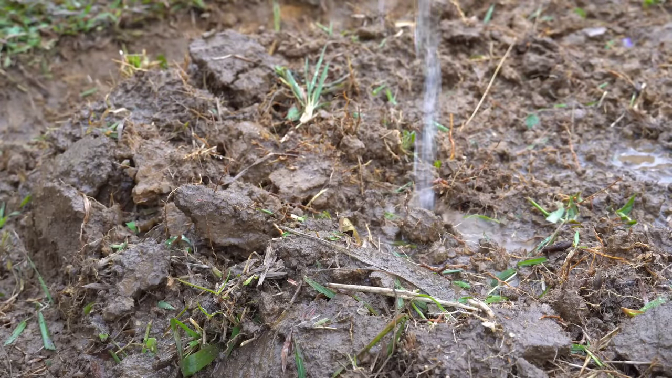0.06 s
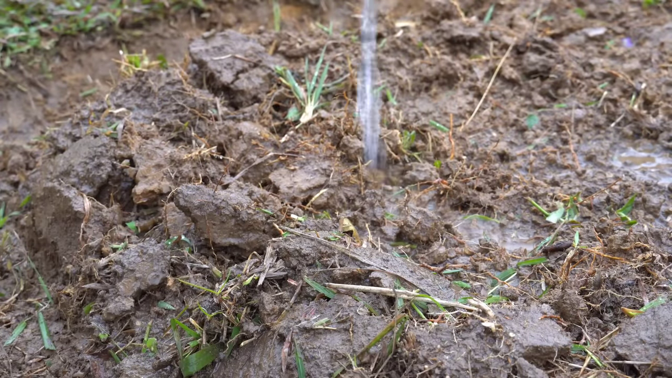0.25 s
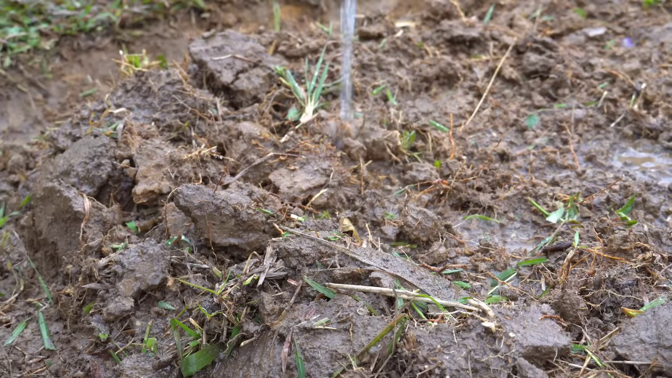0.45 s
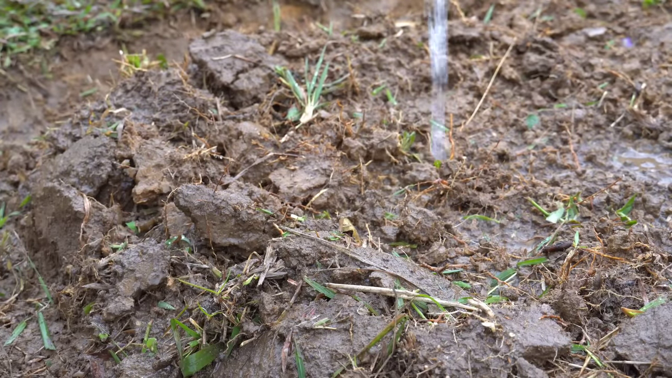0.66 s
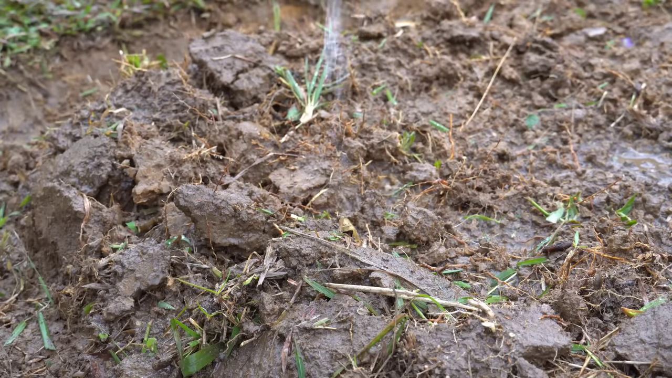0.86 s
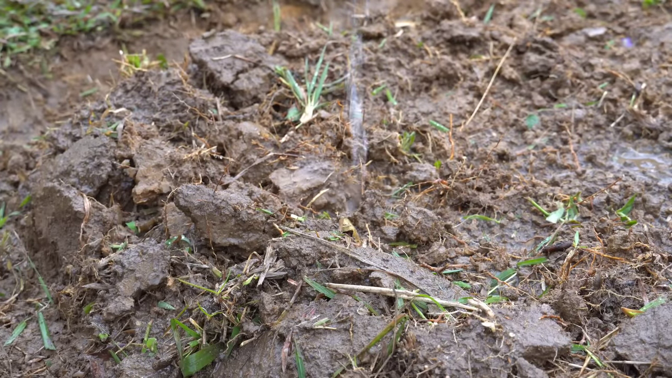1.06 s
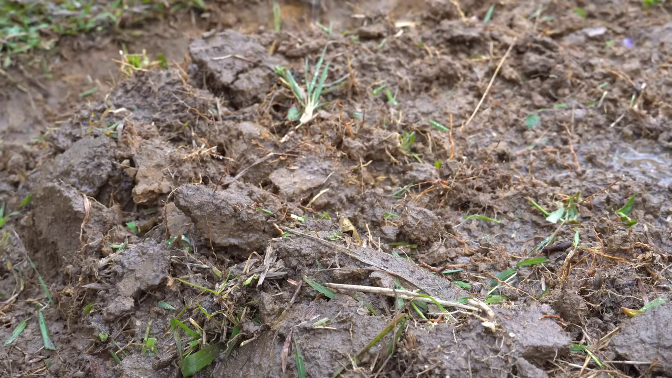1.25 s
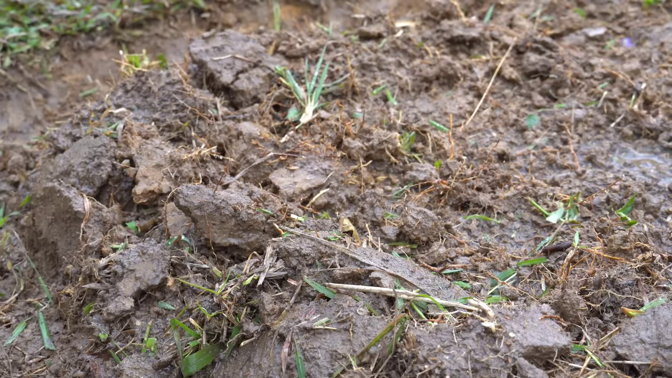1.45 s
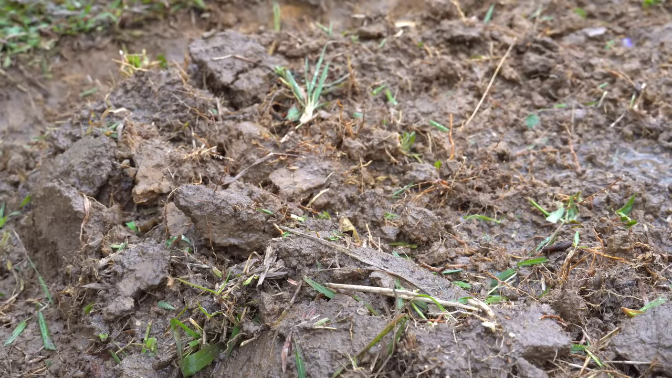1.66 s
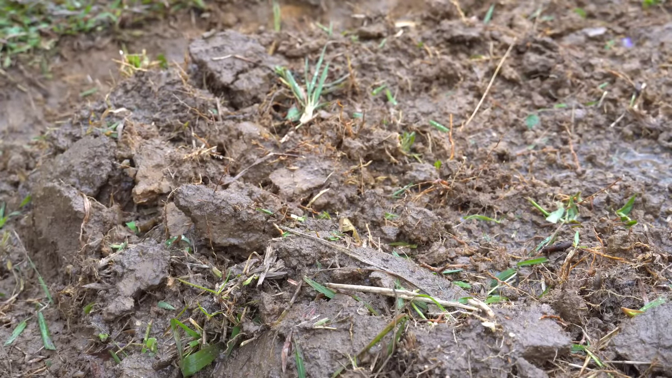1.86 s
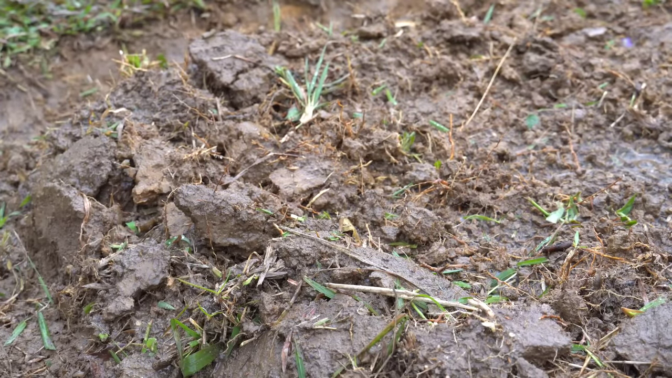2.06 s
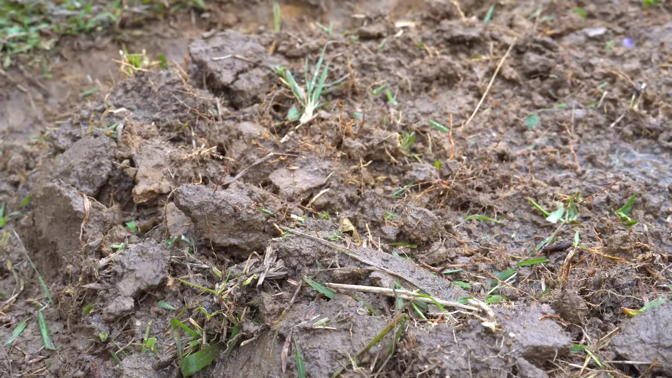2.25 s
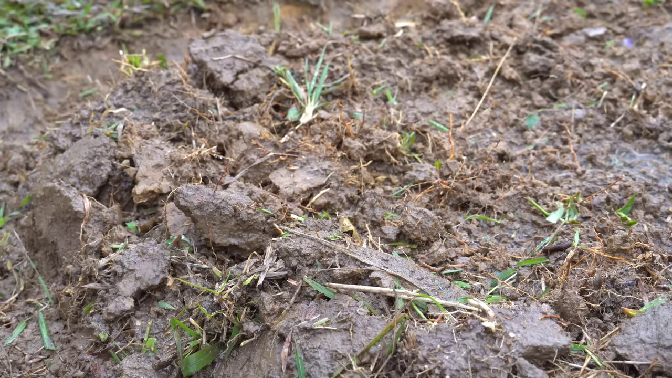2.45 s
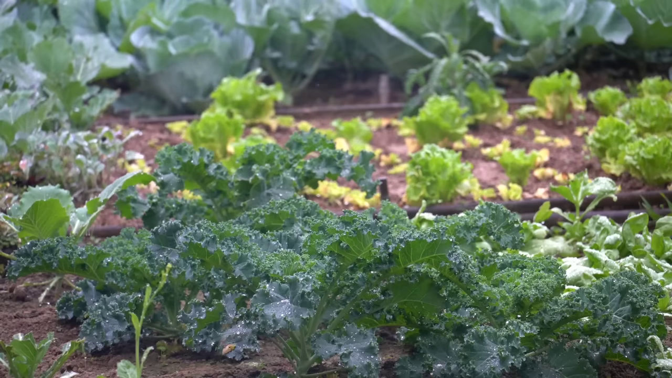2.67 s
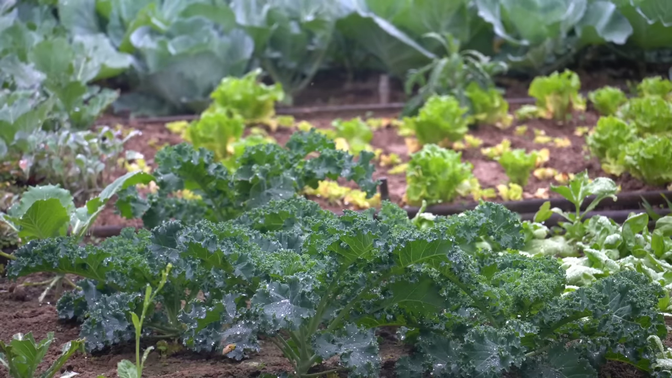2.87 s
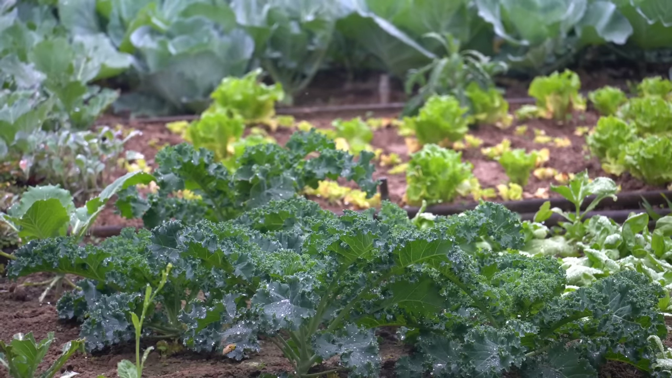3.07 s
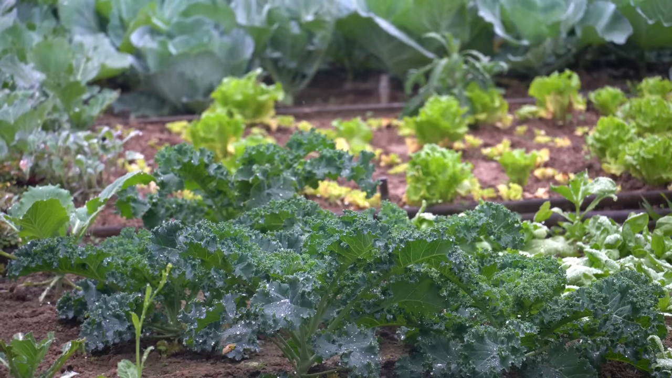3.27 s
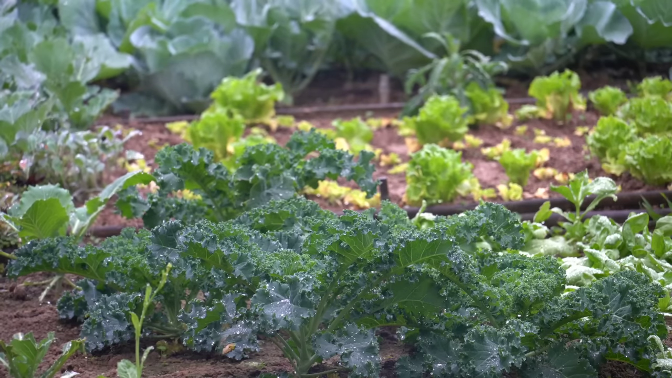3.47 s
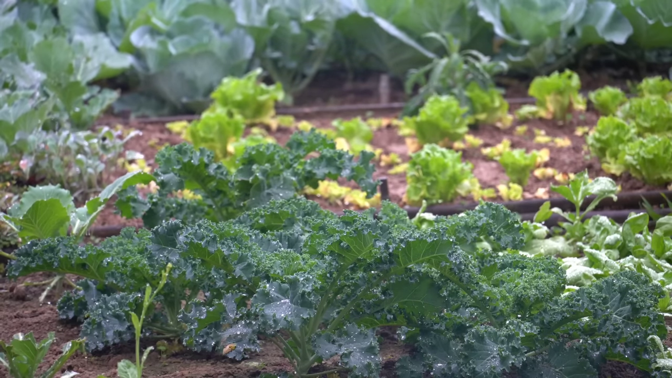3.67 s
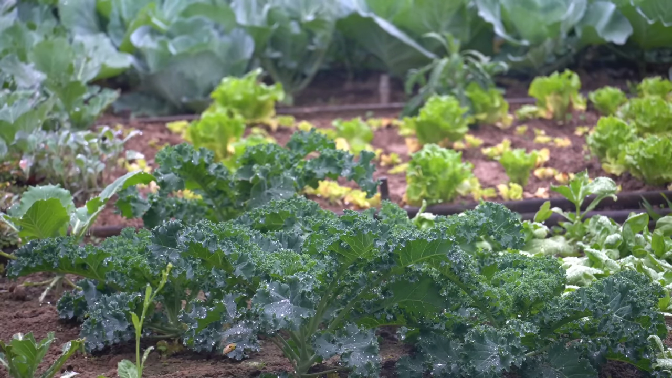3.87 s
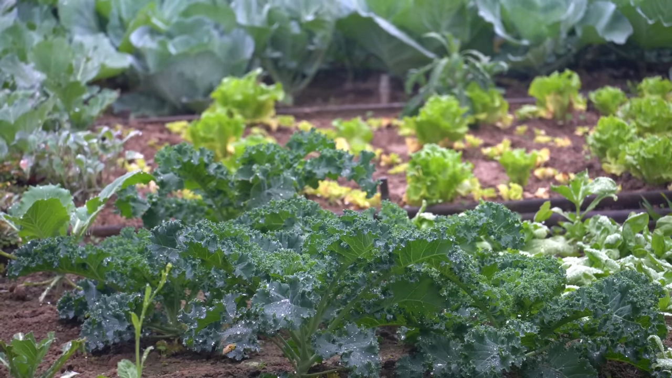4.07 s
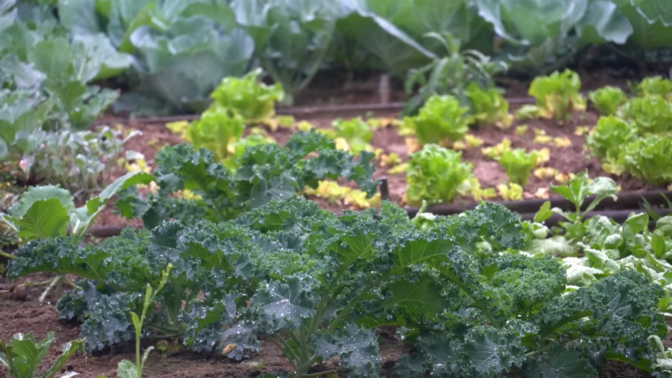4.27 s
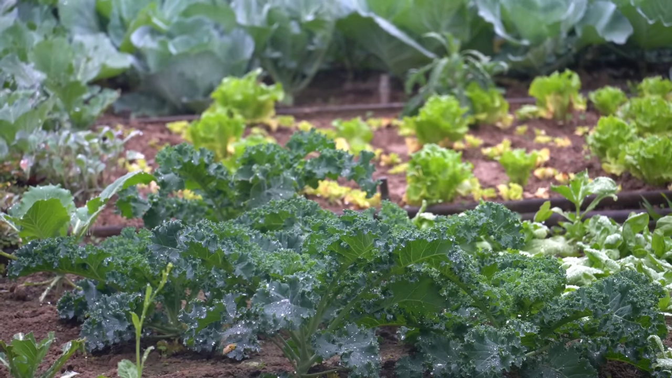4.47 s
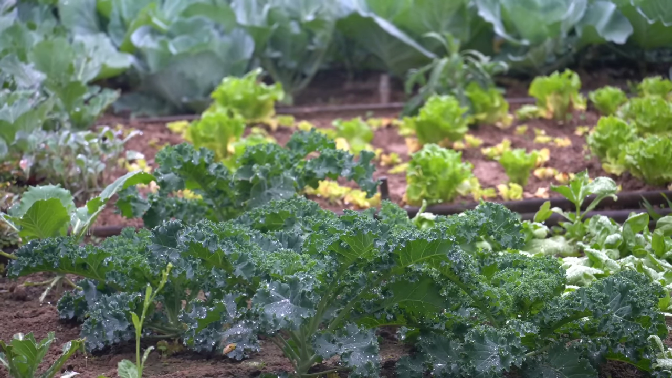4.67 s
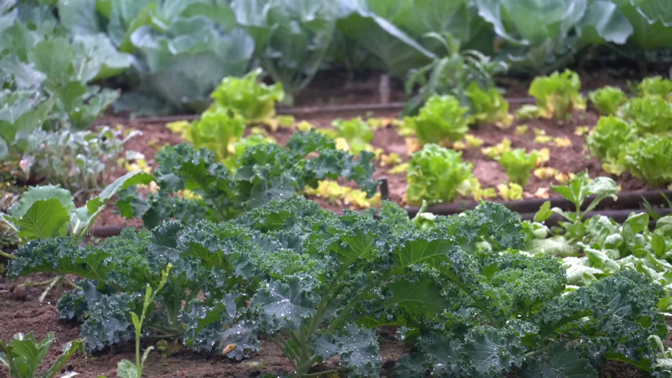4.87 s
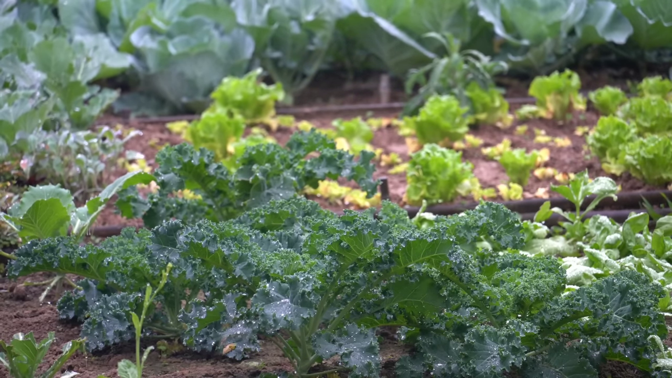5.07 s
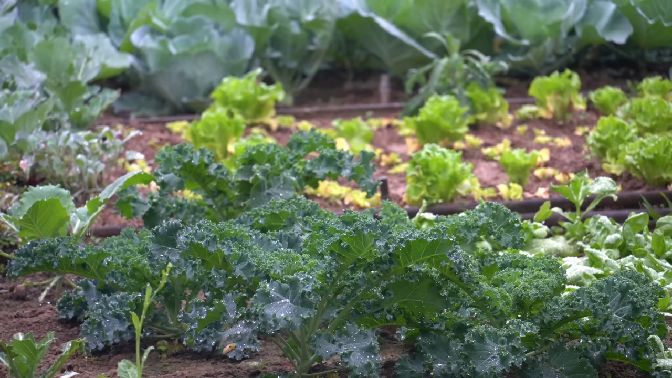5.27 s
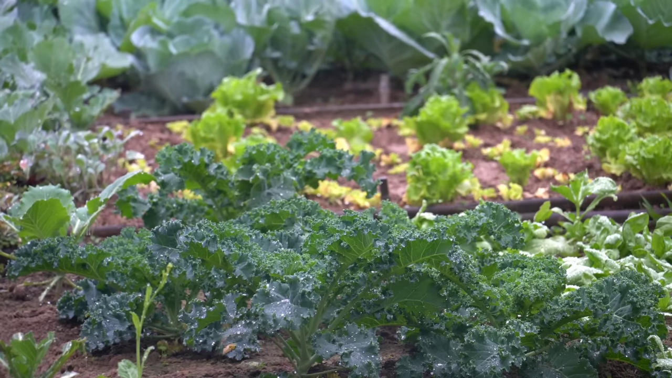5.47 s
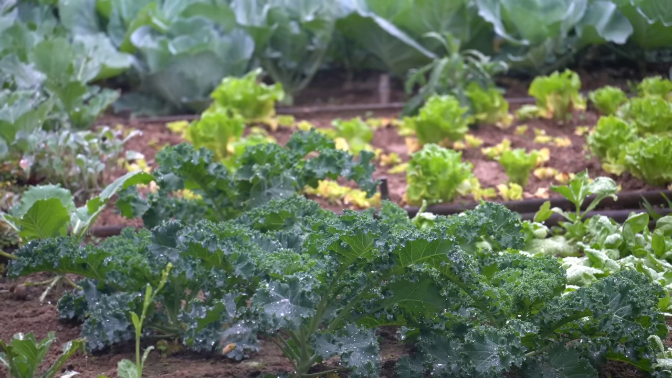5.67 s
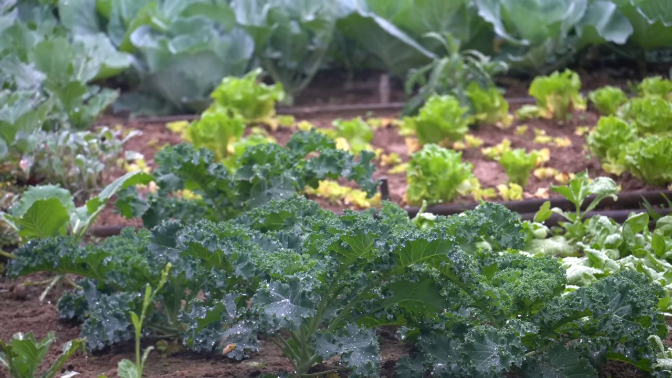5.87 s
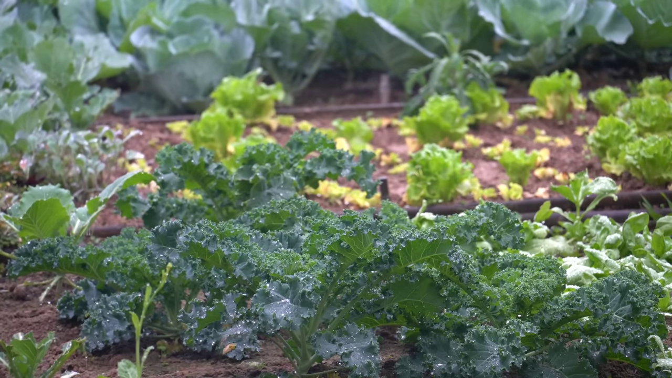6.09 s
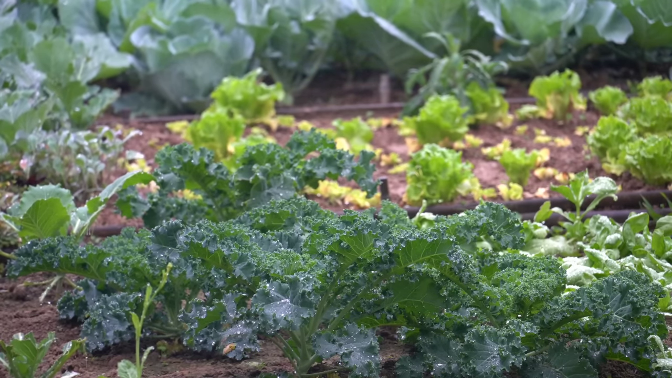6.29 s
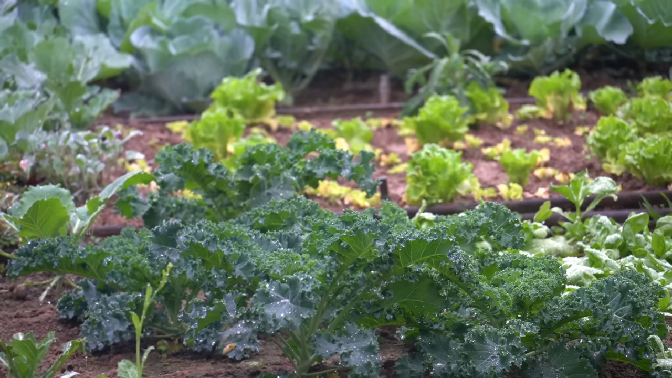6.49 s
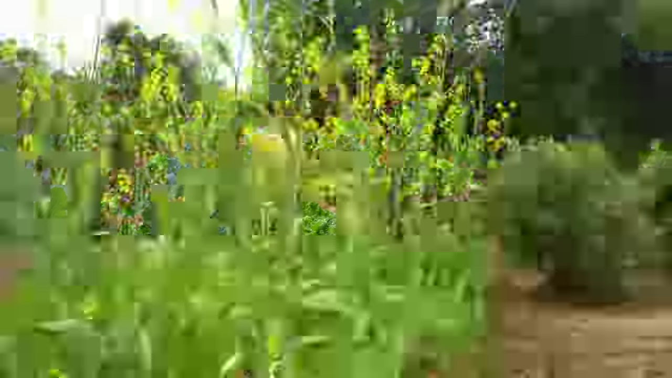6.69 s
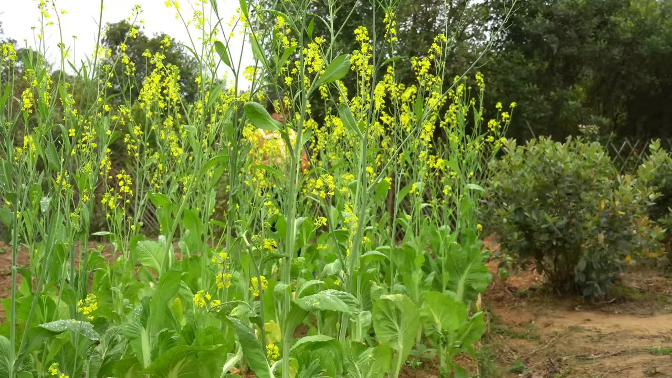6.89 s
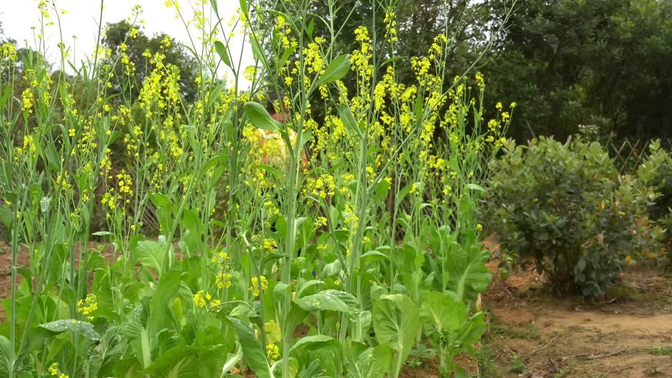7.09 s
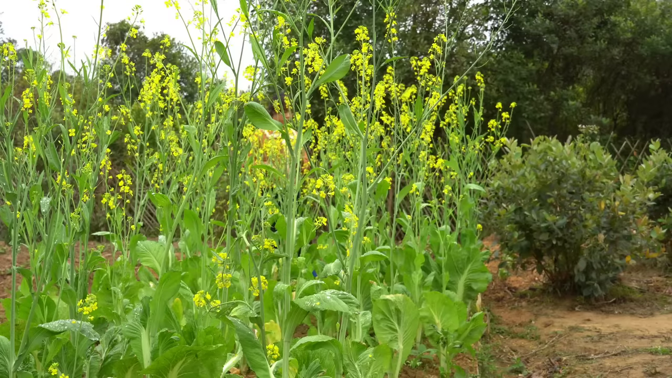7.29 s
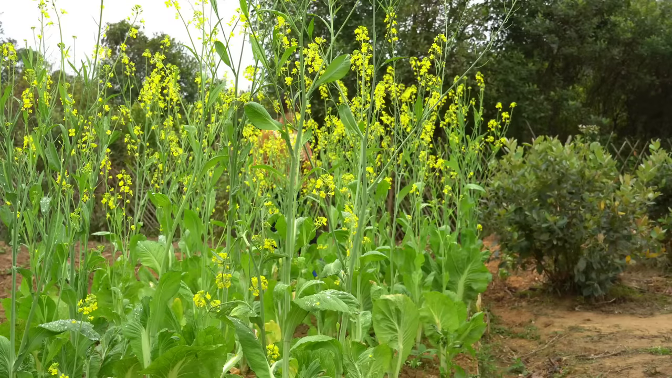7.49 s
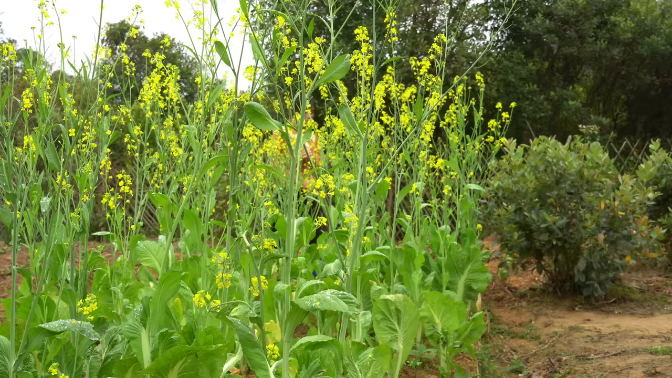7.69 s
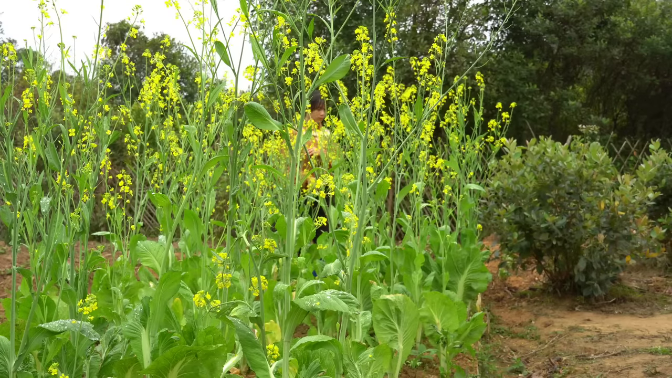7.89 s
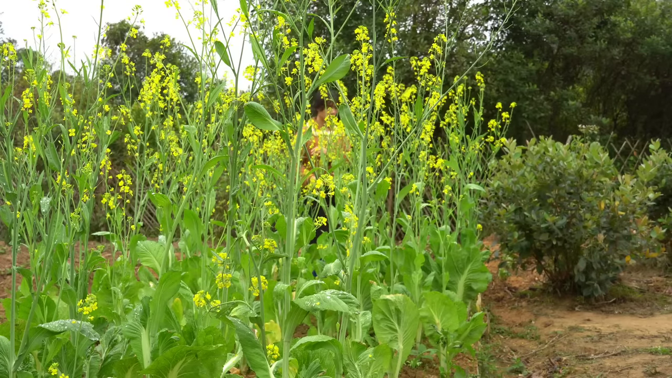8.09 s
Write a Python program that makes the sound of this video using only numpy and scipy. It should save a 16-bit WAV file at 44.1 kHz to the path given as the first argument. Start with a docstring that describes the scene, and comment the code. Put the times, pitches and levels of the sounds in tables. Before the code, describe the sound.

A thin water stream splatters on loose soil and dries to drips, a metal pail clanks, feet scuff earth, then birds and insects outdoors.

```python
"""Close by, a thin stream of water splatters on loose soil and thins to drips: slaps, wet rings and sprays of noise.
A pail, a set of decaying modes, clanks twice; then feet scuff the earth in bursts of shaped noise.
A vegetable bed follows, then an open field, each with its own air and insects made of filtered noise.
Soft thuds and plops, swishing leaves, gliding bird notes and chopped far trills are heard on the way.
In the field a cricket chirps in short sagging tones, and last a far motor drones in summed harmonics."""
import sys
import numpy as np
from scipy import signal
from scipy.fft import rfft, irfft, next_fast_len
from scipy.io import wavfile
from scipy.ndimage import uniform_filter1d, map_coordinates

SR = 44100
rng = np.random.default_rng(int(sys.argv[2]) if len(sys.argv) > 2 else 0)


def transcribe(signal):
    """Save signal, clipped to [-1, 1], as a 16-bit WAV file at the path in sys.argv[1]."""
    frames = np.atleast_2d(signal).T
    limited = np.clip(frames, -1, 1)
    pcm = np.round(limited * 32767).astype(np.int16)
    wavfile.write(sys.argv[1], SR, pcm)


N = 358974
T = np.arange(N) / SR
BED_S, FIELD_S = 2.66, 6.95  # the moments when the place changes

# spectrum of the spray that drops throw up: (frequency [Hz], relative density [dB per Hz])
SPRAY_SPECTRUM = [(240, -48), (400, -16), (605, -48), (663, -21), (900, -17.5), (1220, -8.5), (5910, -4),
                  (6780, -5.5), (14800, -4.5), (15500, -7)]


def amp(db):
    """Decibels to gain."""
    return 10 ** (np.asarray(db) / 20)


def unit(x):
    """Scales to rms 1, over both channels together."""
    return x / np.sqrt(np.mean(x ** 2) + 1e-20)


def read(points, hz):
    """Joins (Hz, value) points on a log-frequency axis."""
    f, value = np.transpose(points)
    return np.interp(np.log(hz + 1), np.log(f + 1), value)


def add(mix, s, sound):
    """Adds a sound into the mix at a time, or at the very start if the time is negative."""
    part = mix[:, max(round(s * SR), 0):][:, :sound.shape[-1]]
    part += sound[..., :part.shape[-1]]


def noise(*shape):
    """Two channels of unrelated white noise."""
    return rng.standard_normal((2, *shape))


def colour(x, points):
    """Shapes the spectrum of a signal."""
    size = next_fast_len(x.shape[-1])
    gain = amp(read(points, np.fft.rfftfreq(size, 1 / SR)))
    return irfft(rfft(x, size) * gain, size)[..., :x.shape[-1]]


def resonate(x, hz, width_hz):
    """A two-pole resonance with a peak gain of 1."""
    hz = min(hz, SR / 2 - 1000)
    return signal.lfilter(*signal.iirpeak(hz, hz / min(width_hz, SR / 4), SR), x)


def wander(rate_hz, size):
    """A smooth random curve through normal knots, of rms near 1."""
    knots = rng.standard_normal(int(size * rate_hz / SR) + 4)
    return map_coordinates(knots, [1 + np.arange(size) * rate_hz / SR], order=3, mode="nearest")


def pair(z, same):
    """Makes two unrelated signals partly alike, as a pair of microphones hears them."""
    same = np.clip(same, 0, 1)
    return np.array([z[0], same * z[0] + np.sqrt(1 - same ** 2) * z[1]])


def pan(db):
    """Gains for a left-right difference, positive to the left."""
    return amp([[db / 2], [-db / 2]])


def spaced(x, side_db, lag_s=.0000075):
    """Two close microphones: the louder side also hears the sound sooner, by lag_s for each dB."""
    x = x * np.ones((2, 1))
    size = next_fast_len(x.shape[1])
    lag = np.exp(-2j * np.pi * np.fft.rfftfreq(size, 1 / SR) * lag_s * side_db)
    right = irfft(rfft(x[1], size) * lag, size)[:x.shape[1]]
    return np.array([x[0], right]) * pan(side_db)


def moments(start, end, per_s):
    """Unevenly spaced events, one in each slot: rows of a time and two chance values from -1 to 1."""
    slots = np.arange(start, end, 1 / per_s)
    chance = rng.random((len(slots), 3))
    return np.column_stack([slots + chance[:, 0] / per_s, 2 * chance[:, 1:] - 1])


def splats(crack=0.33, slop=0.12, lead=0.64, slop_decay=3.7, spray_decay=1.36, spray_crack=0.35,
           clump_db=5.0, width=0.18, spray_trim_db=-1, same=0.95):
    """Each drop slaps the mud, rings a small wet cavity and throws a short spray."""
    # big drops on wet soil:
    # (time [s], ring level [dB], cavity pitch [Hz], spray level before the trim [dB])
    big_drops = [(0.0069, -27, 5790, -25), (0.0343, -36, 4600, -29), (0.062, -23, 7430, -21),
                 (0.0817, -22, 3400, -34), (0.093, -24, 4600, -20.5), (0.1028, -24.5, 4250, -20.5),
                 (0.1082, -29.5, 1530, -31), (0.126, -29, 6270, -28), (0.1416, -16, 5900, -33),
                 (0.156, -29, 5680, -32), (0.171, -24, 5620, -20), (0.2019, -44, 6090, -22),
                 (0.223, -28, 4500, -22), (0.2357, -39, 8600, -24), (0.256, -24, 2690, -22.5),
                 (0.2829, -26.5, 9300, -25), (0.296, -23.5, 3640, -22.5), (0.304, -25, 5150, -44),
                 (0.368, -25, 4850, -27.5), (0.415, -27.5, 4400, -32), (0.476, -28.5, 4910, -27),
                 (0.5686, -21, 1740, -26), (0.675, -31, 4150, -29), (0.7076, -27, 8500, -38),
                 (0.72, -25.5, 2360, -36), (0.7298, -21.5, 8000, -25), (0.759, -32, 8980, -19.5),
                 (0.8025, -32, 7060, -25), (0.8145, -36, 7000, -23.5), (0.832, -28, 3800, -21.5),
                 (0.8586, -37, 3850, -27), (0.8657, -41, 4970, -24.5), (0.877, -39, 7920, -30),
                 (0.9146, -31, 5000, -28), (0.9347, -34.5, 3640, -39), (0.95, -32.5, 7450, -26),
                 (0.9627, -30.5, 3750, -32), (1.0027, -31.5, 8000, -27), (1.0347, -37, 5260, -34.5),
                 (1.052, -39, 2625, -37), (1.0675, -36, 4890, -35), (1.1134, -39, 8420, -42),
                 (1.1357, -36, 5790, -33), (1.151, -35, 5900, -35), (1.2002, -40, 5470, -31.5),
                 (1.22, -34, 3340, -31), (1.2525, -23, 1860, -38), (1.274, -37, 2610, -42),
                 (1.619, -32.5, 5600, -34), (1.6464, -30, 9050, -45), (1.675, -22.5, 7440, -30)]
    flatten_s = 0.002  # how long a drop takes to flatten
    clean_halves_db = 12.5  # a drop that rings this much more than it sprays is over in half the time
    out, t = np.zeros((2, N)), np.arange(-512, 1024) / SR
    span = np.sqrt(.006 * SR / len(t))  # refers the levels to 6 ms of sound
    before, after = np.minimum(t, 0), np.maximum(t, 0)
    for s, cavity_db, hz, droplets_db in [*big_drops, *small_drops()]:
        length = flatten_s * 2 ** (-max(cavity_db - droplets_db, 0) / clean_halves_db)
        push = pair(noise(len(t)), same)
        mist = pair(noise(len(t)), same)
        slap = np.exp((3 * before - after) / (crack * length))
        mud = np.exp(before / (lead * length)) * amp(clump_db * wander(1071, len(t)))
        blow = push * (slap + slop * mud * np.exp(-after / (slop_decay * length)))
        ring = resonate(resonate(blow, hz, width * hz), hz, hz)
        burst = spray_crack * slap + mud * np.exp(-after / (spray_decay * length))
        spray = colour(mist * burst, SPRAY_SPECTRUM)
        sound = amp(cavity_db) * unit(ring) + amp(droplets_db + spray_trim_db) * unit(spray)
        start = s + t[0] - crack * length / 2
        add(out, start, span * spaced(sound, rng.normal(0, 1.7), lag_s=.000005))
    return out


def small_drops(until_s=0.85, per_s=26, start_db=-31.5, fall_db_per_s=3.5, spread_db=3, ring_db=-2):
    """Small drops of any pitch fall between the big ones, weaker as the stream thins."""
    rows = []
    for s, pitch, size in moments(0, until_s, per_s):
        db = start_db - fall_db_per_s * s + spread_db * size
        rows.append((s, db + ring_db, np.interp(pitch, [-1, 1], [2540, 8950]), db))
    return rows


def spatter(per_s=420, trim_db=-1.5, decay_s=0.0022, width=0.25, same=0.92):
    """Thrown droplets land all around, each a tiny wet fizz with a pitch of its own."""
    # fine spatter as the stream thins: (time [s], level before the trim [dB])
    thinning = [(0, -33.5), (.1, -30), (.25, -38.5), (.5, -31), (.62, -38), (.77, -34.5), (.9, -50),
                (1.1, -47), (1.21, -36.5), (1.361, -44)]
    out, t = np.zeros((2, N)), np.arange(512) / SR
    s, db = np.transpose(thinning)
    for when, pitch, side in rng.random((int(per_s * s[-1]), 3)):
        hz = 1800 + 12500 * pitch ** 1.3
        fizz = pair(noise(len(t)), same) * np.sqrt(t) * np.exp(-t / decay_s)
        add(out, when * s[-1], unit(resonate(fizz, hz, width * hz)) * pan(6 * (side - .5)))
    out = colour(out, SPRAY_SPECTRUM)
    return out / np.std(out[:, T < s[-1]]) * amp(np.interp(T, s, db) + trim_db)


def pail(scrape_s=0.01, rattle=0.4, rattle_s=0.1):
    """A knock rings the thin wall of the pail while the rim scrapes and rattles."""
    # knocks, the force given as the frequency where the ring dulls:
    # (time [s], ring level [dB], scrape level [dB], force [Hz])
    knocks = [(0.4209, -33, -28.5, 496), (0.4859, -30, -25, 2487)]
    # modes of the wall: (frequency [Hz], relative level [dB], time to fall by 60 dB [s])
    modes = [(163, -5, 0.34), (229.6, -2.5, 0.73), (246, -16, 0.33), (317.7, -16.5, 1), (537, -9, .35),
             (645, -4.5, 0.61), (730, -9, 0.47), (897, 3, .38), (1040, 0, .42), (1694, 2, .36),
             (1280, -20, .3), (1720, 4, 0.33), (2060, -13, 0.3), (2630, -11, .4), (3120, 10, 0.13),
             (3280, 2, 0.19), (3630, -6, 0.23), (3898, -15, 0.31), (4450, 4, 0.2), (4700, -3, 0.2)]
    grit_spectrum = [(80, -20), (200, -22), (900, 6.0), (3500, 6.5), (7000, -13), (15000, -10)]  # (Hz, dB)
    out, t = np.zeros((2, N)), np.arange(SR) / SR
    for s, ring_db, scrape_db, dull_hz in knocks:
        ring = np.zeros((2, len(t)))
        for hz, db, t60 in modes:
            phase = 2 * np.pi * rng.random() + rng.normal(0, 0.11, (2, 1))
            tone = np.sin(2 * np.pi * hz * t + phase)
            ring += amp(db - 60 * t / t60) * tone / np.hypot(1, hz / dull_hz)
        grit = pair(noise(len(t)), 0.95) * amp(3.8 * wander(500, len(t)))
        grit = unit(colour(grit, grit_spectrum))
        scrape = grit * (np.exp(-t / scrape_s) + rattle * np.exp(-t / rattle_s))
        onset = np.minimum(t / 0.00067, 1)
        add(out, s, (amp(ring_db) * ring + amp(scrape_db) * scrape) * onset)
    return out


def feet(attack_s=0.017, release_s=0.015, lump_db=4.4, grit_db=2.5):
    """Soles press the crumbs of earth, off to the left: a dull lumpy scuff under a gritty rustle."""
    # soles sliding: (time [s], length [s], dull scuff level before a 1 dB cut [dB], dry rustle level [dB])
    slides = [(1.379, .11, -45.5, -40), (1.464, 0.037, -45, -35.5), (1.556, .03, -45, -36),
              (1.605, 0.089, -54, -35), (1.794, 0.057, -41.5, -31), (1.858, 0.19, -39, -41.5),
              (2.163, 0.014, -39, -51), (2.289, 0.062, -49, -33), (2.323, 0.066, -36.5, -49),
              (2.418, 0.039, -36.5, -52), (2.487, .1, -49, -44.5)]
    # spectrum of the dull scuff: (frequency [Hz], relative density [dB per Hz])
    scuff_spectrum = [(45, -2), (85, 3), (130, -3), (230, 1.5), (420, -1), (750, -10.5), (1400, -15.5),
                      (3000, -26)]
    # spectrum of the dry rustle: (frequency [Hz], relative density [dB per Hz])
    rustle_spectrum = [(530, -34), (900, -1), (1230, -8), (1560, -3), (1750, -7), (2310, -3.5),
                       (3030, -1.5), (15500, -1)]
    scuff = unit(colour(pair(noise(N), 1.0) * amp(lump_db * wander(90, N)), scuff_spectrum))
    rustle = unit(colour(pair(noise(N), 0.11) * amp(grit_db * wander(700, N)), rustle_spectrum))
    step = np.zeros((2, N))
    for s, length, scuff_db, rustle_db in slides:
        press = np.clip((T - s) / attack_s, 0, 1)
        press = press * np.exp(-np.maximum(T - s - length, 0) / release_s)
        step += press * (scuff * amp(scuff_db - 1) + rustle * amp(rustle_db))
    return spaced(step, side_db=5.5, lag_s=.00002)


def thuds(grain=0.15, decay_cycles=1.6):
    """Soft blows, a sine with a little resonant noise, that ring for only a few cycles."""
    # the clearest soft thuds and plops: (time [s], level before the envelope [dB], pitch [Hz])
    clear_thuds = [(1.586, -23.5, 1100), (1.672, -19, 1020), (1.849, -26.5, 238), (1.928, -21.5, 340),
                   (2.017, -20, 185), (2.338, -23, 130), (2.38, -23.5, 145), (2.437, -25, 209),
                   (3.263, -26, 404), (5.22, -28, 245), (5.274, -28.5, 252), (5.509, -27, 260),
                   (5.595, -26.5, 230), (6.516, -20.5, 1010)]
    out, t = np.zeros((2, N)), np.arange(SR // 8) / SR
    for s, db, hz in [*clear_thuds, *plops()]:
        body = np.sin(2 * np.pi * hz * t) + grain * unit(resonate(noise(len(t)), hz, hz))
        envelope = (1 - np.exp(-t * hz * 2)) * np.exp(-t * hz / decay_cycles)
        add(out, s, amp(db) * body * envelope * pan(0.82))
    return out


def plops(from_s=5.6, to_s=6.7, per_s=9, centre_hz=232, level_db=-29.5, spread_db=3, spread_octaves=0.38):
    """Faint low plops at uneven moments, each a little different."""
    return [(s, level_db + spread_db * size, centre_hz * 2 ** (spread_octaves * pitch))
            for s, pitch, size in moments(from_s, to_s, per_s)]


def leaves(width=0.88):
    """Short swishes of foliage and crumbling earth, as bursts of broad resonant noise."""
    # swishes: (time [s], length [s], level [dB], centre frequency [Hz])
    swishes = [(1.369, 0.049, -37.5, 3360), (1.373, 0.11, -41, 730), (1.9, 0.1, -45.5, 1290),
               (2.6, 0.051, -40, 2100), (2.865, 0.073, -40, 3980), (2.956, 0.023, -41, 5000),
               (4.828, 0.024, -45, 6000), (4.312, 0.066, -42, 6500), (5.149, 0.072, -42, 3570),
               (5.403, 0.068, -39, 5500), (5.712, 0.058, -40.5, 4800), (6.456, 0.051, -39, 6500)]
    out = np.zeros((2, N))
    for s, length, db, hz in swishes:
        size = max(int(length * SR), 64)
        hiss = pair(noise(size), 0.29) * amp(2.8 * wander(409, size))
        hiss = resonate(hiss, hz, width * hz)
        add(out, s, amp(db) * unit(hiss * signal.windows.tukey(size, .7)))
    return out


def birds(buzz_hz=150, buzz_depth=0.087, flutter_db=1.5):
    """Gliding tones; a fast tremble of the pitch makes some of them buzz."""
    out = np.zeros((2, N))
    for s, length, start_hz, end_hz, bend, db, buzz, side_db in notes():
        u = np.linspace(0, 1, max(int(length * SR), 64))
        tremble = np.sin(2 * np.pi * buzz_hz * length * u) + 0.36 * wander(493.0, len(u))
        glide = end_hz + (start_hz - end_hz) * (1 - u) ** bend
        hz = glide * (1 + buzz * buzz_depth * tremble)
        flutter = amp(flutter_db * wander(223.6, len(u)))
        note = np.sin(2 * np.pi * np.cumsum(hz) / SR) * flutter * signal.windows.tukey(len(u), .35)
        add(out, s, amp(db) * spaced(unit(note), side_db))
    return out


def notes(chatter_s=0.045, chatter_octaves=0.2, chatter_glide=0.035, chatter_buzz=0.23, chatter_side_db=4):
    """The shape of each bird note: rows of (s, length s, start Hz, end Hz, bend, dB, buzz 0-1, left-right dB)."""
    # one bird's falling slur, steep at first: (time [s], length [s], start pitch [Hz], end pitch [Hz],
    # level [dB], buzz [0-1], left-right difference [dB])
    slurs = [(0.26, .23, 5150, 4480, -41.5, 0.32, 7), (1.558, 0.28, 5890, 4400, -38.5, 0.29, -8),
             (2.65, .15, 6230, 4820, -35, 0.53, -7), (3.367, 0.15, 5800, 3980, -41.5, 1, -8),
             (3.912, .24, 5570, 4450, -41, 0.83, 4.5), (5.632, .17, 5820, 4550, -42.5, 1, -7)]
    # another bird's rising chirp, levelling off at the top: (time [s], level [dB])
    rises = [(3.03, -29), (5.381, -39.5), (5.602, -40.5)]
    # a far bird's pips on nearly one pitch: (time [s], level [dB])
    pips = [(3.122, -44.5), (4.766, -43.5), (5.295, -36.5), (5.492, -46), (5.859, -36.5), (6.462, -42.5),
            (7.18, -54)]
    # other single notes: whistles, quick flicks, and onsets of the chirp and slur:
    # (time [s], length [s], start pitch [Hz], end pitch [Hz], level [dB], left-right difference [dB])
    single_notes = [(0.35, 0.12, 2350, 2360, -47.5, 9), (2.635, 0.015, 2060, 3050, -37, -3),
                    (2.663, 0.014, 3360, 2240, -41, -4), (2.687, 0.12, 1980, 2704, -37, -4),
                    (2.91, 0.016, 1546, 1580, -34.5, -5), (3.025, 0.011, 3470, 2560, -25.5, -7),
                    (4.775, 0.016, 4170, 4400, -36.5, 4), (5.132, 0.022, 934, 1145, -33, 4),
                    (5.634, .026, 5670, 5900, -38, -10), (5.69, .042, 1740, 1487, -42, 0),
                    (7.455, .035, 3500, 2700, -57, 5), (7.524, .08, 3080, 2980, -54, 8),
                    (8.03, .03, 2850, 2760, -47.5, 6)]
    # far birds twittering at random: (start [s], end [s], rate [notes per s], centre pitch [Hz], level [dB])
    chatter = [(3.499, 6.898, 15, 3853, -52), (6.951, 8.1, 15, 2907, -58)]
    rise_s, rise_start_hz, rise_end_hz, rise_side_db = 0.076, 2850, 3570, -8.5
    rows = []
    for s, length, high, low, db, buzz, side in slurs:
        rows.append((s, length, high, low, 1.9, db, buzz, side))
    for s, db in rises:
        rows.append((s, rise_s, rise_start_hz, rise_end_hz, 1.9, db, 0.49, rise_side_db))
        # its top note rings on among the trees
        rows.append((s + rise_s, 0.2, rise_end_hz, rise_end_hz, 1, db - 16.5, 0.25, rise_side_db))
    for s, db in pips:
        rows.append((s, 0.034, 1813, 1880, 1, db, 0.16, 0))
    for s, length, first, last, db, side in single_notes:
        rows.append((s, length, first, last, 1.6, db, 0.04, side))
    for start, end, per_s, centre_hz, db in chatter:
        for s, pitch, slope in moments(start, end, per_s):
            hz = centre_hz * 2 ** (chatter_octaves * pitch)
            end_hz = hz * (1 + chatter_glide * slope)
            side = chatter_side_db * rng.normal()
            rows.append((s, chatter_s, hz, end_hz, 1, db, chatter_buzz, side))
    return rows


def trills(waver=0.021, uneven_db=6.0):
    """A thin wavering tone chopped into quick, uneven strokes."""
    # faint far trills: (time [s], length [s], pitch [Hz], mean rate [strokes per s], level [dB])
    far_trills = [(4.303, 0.78, 4260, 29, -53), (4.55, .2, 3710, 13, -51), (5.895, 0.55, 3940, 13.2, -57),
                  (6.348, 0.59, 3970, 17, -66)]
    out = np.zeros((2, N))
    for s, length, hz, per_s, db in far_trills:
        size = int(length * SR)
        rate = per_s * (1 + 0.42 * wander(17.3, size))
        strokes = np.sin(np.pi * np.cumsum(rate) / SR) ** 4
        tone = np.sin(2 * np.pi * np.cumsum(hz * (1 + waver * wander(121, size))) / SR)
        uneven = amp(uneven_db * wander(20.6, size))
        add(out, s, amp(db) * spaced(unit(tone * strokes * uneven), -2.0))
    return out


def cricket(per_s=13, hz=6120, sag=0.032, length_s=0.027, level_db=-57, spread_db=3):
    """A cricket chirps unevenly in the field; each wing stroke is a short tone that sags in pitch."""
    out, u = np.zeros((2, N)), np.linspace(0, 1, int(length_s * SR))
    for s, pitch, size in moments(FIELD_S, T[-1], per_s):
        phase = 2 * np.pi * np.cumsum(hz * (1 + .012 * pitch + sag * (.5 - u))) / SR
        stroke = unit(np.sin(phase) * np.sin(np.pi * u))
        add(out, s, amp(level_db + spread_db * size) * spaced(stroke, -10.5))
    return out


def motor(start_s=7.48, start_hz=196, end_hz=187, level_db=-57):
    """A far motor drones faintly and slows a little: harmonics 4 to 17 of its turning rate."""
    size = N - int(start_s * SR)
    turns = np.cumsum(np.linspace(start_hz, end_hz, size)) / SR
    drone = np.zeros((2, size))
    for channel in drone:
        for k in range(4, 18):
            harmonic = np.sin(2 * np.pi * (k * turns + rng.random()))
            channel += harmonic * amp(3 * wander(5.6, size)) / np.sqrt(k)
    out = np.zeros((2, N))
    add(out, start_s, amp(level_db) * unit(drone * signal.windows.tukey(size, .2)))
    return out


def insects(choruses, throb_db=1):
    """Many far insects blend into resonant bands of noise that throb gently."""
    out = np.zeros((2, N))
    for hz, width_hz, db in choruses:
        band = resonate(resonate(pair(noise(N), 0.36), hz, width_hz), hz, width_hz)
        out += unit(band) * amp(db + throb_db * wander(60, N))
    return out


def air(spectrum, level_db, patch_db, swell_db=-0.46):
    """Distant outdoor wash: noise frames with drifting patches, nearly mono in the bass."""
    # left-right likeness of the air: (frequency [Hz], likeness [0-1])
    likeness = [(25, 0.995), (60, 0.96), (130, 0.93), (290, 0.29), (640, 0.27), (1400, 0.26), (3100, 0.27),
                (7000, 0), (15000, 0.2)]
    frames, hz = N // 512 + 5, np.fft.rfftfreq(2048, 1 / SR)
    z = noise(frames, len(hz)) + 1j * noise(frames, len(hz))
    z = pair(z, read(likeness, hz))
    patches = rng.standard_normal((frames, len(hz)))
    patches = uniform_filter1d(patches, size=8, axis=0)  # over time
    patches = unit(uniform_filter1d(patches, size=20, axis=1))  # over frequency
    z = z * amp(read(spectrum, hz) + patch_db * patches)
    wash = signal.istft(z.transpose(0, 2, 1), nperseg=2048, noverlap=1536)[1][:, :N]
    return unit(wash) * amp(level_db + swell_db * wander(4.39, N))


def echoes(x, t60, dull_hz):
    """Sparse scattered reflections that die away, unrelated in each ear."""
    t = np.arange(SR // 2) / SR
    sparse = (rng.random((2, len(t))) < .1) * (t > .004)
    taps = noise(len(t)) * sparse * amp(-60 * t / t60)
    taps = signal.lfilter(*signal.butter(1, min(dull_hz, SR / 2.5), fs=SR), taps)
    return signal.oaconvolve(x, taps / np.linalg.norm(taps[0]), axes=1)[:, :N]


def during(start, end, fade=0.087):
    """An equal-power window, open at the ends of the scene."""
    rise = np.clip((T - start) / fade + .5, 0, 1) if start > fade else 1
    fall = np.clip((end - T) / fade + .5, 0, 1) if end < T[-1] - fade else 1
    return np.sin(np.pi / 2 * rise * fall)


def scene():
    """Near sounds with a little ground scatter, birds with the echo of trees, and the air of three places."""
    # the air over the soil: (frequency [Hz], relative density [dB per Hz])
    soil_air = [(20, -22), (45, 0.5), (70, 0.5), (130, 0), (400, -6), (1000, -11), (3000, -13), (7000, -16),
                (10000, -18), (15500, -18.5)]
    # the air of the vegetable bed: (frequency [Hz], relative density [dB per Hz])
    bed_air = [(20, -21), (45, 5.5), (70, 3), (130, -2.5), (240, -2.5), (450, -5.5), (1500, -5.5),
               (2700, -6.5), (3800, -7), (5500, -11), (6100, -11.5), (8500, -14.5), (15500, -19.5)]
    # the air of the open field: (frequency [Hz], relative density [dB per Hz])
    field_air = [(20, -19), (45, 2), (70, 2.5), (130, -3.5), (400, -7.5), (1200, -12.5), (3000, -13.5),
                 (4500, -16.5), (6500, -19), (10000, -23), (15500, -27)]
    # insect choruses by place: (centre frequency [Hz], width of each resonance [Hz], level before throb [dB])
    choruses = {"soil": [(7800, 1000, -54.5), (5800, 800, -58)], "bed": [(1970, 224, -45.5),
                (3750, 760, -55.5), (6920, 760, -48.5)], "field": [(8030, 1200, -52), (5920, 220, -65),
                (3000, 330, -65), (1820, 270, -64)]}
    near = splats() + spatter() + pail() + feet() + thuds() + leaves()
    near_scatter = amp(-22.5) * echoes(near, t60=0.5, dull_hz=8050)
    song = birds() + trills()
    tree_echo = amp(-10.0) * echoes(song, t60=0.45, dull_hz=7000)
    soil = air(soil_air, level_db=-43.0, patch_db=1.8) + insects(choruses["soil"])
    bed = air(bed_air, level_db=-37.5, patch_db=1.5) + insects(choruses["bed"])
    field = air(field_air, level_db=-43.0, patch_db=1.3) + insects(choruses["field"])
    field += cricket() + motor()
    places = soil * during(0, BED_S) + bed * during(BED_S, FIELD_S) + field * during(FIELD_S, T[-1])
    return near + near_scatter + song + tree_echo + places


def record(dry, low_cut_hz=36, edge_hz=15600):
    """The microphone sheds the deepest rumble; then the recorder's band limit."""
    low_cut = signal.butter(4, low_cut_hz, "highpass", fs=SR, output="sos")
    band_limit = signal.firwin(511, edge_hz, window=("kaiser", 9), fs=SR)
    return signal.oaconvolve(signal.sosfilt(low_cut, dry), band_limit[None], "same")


dry = scene()
out = record(dry)
transcribe(out)
```